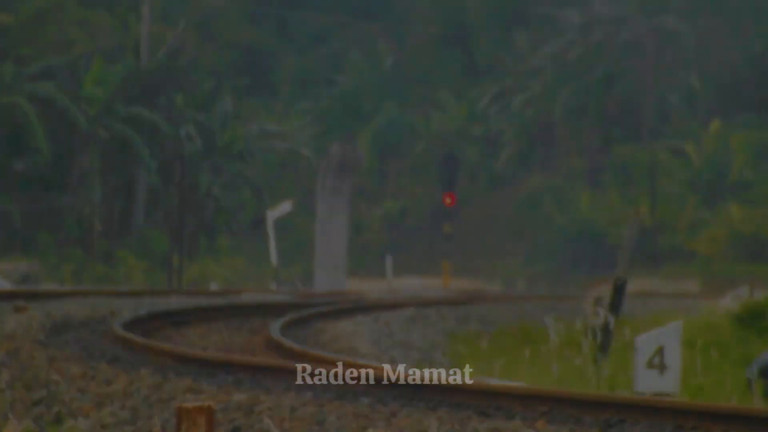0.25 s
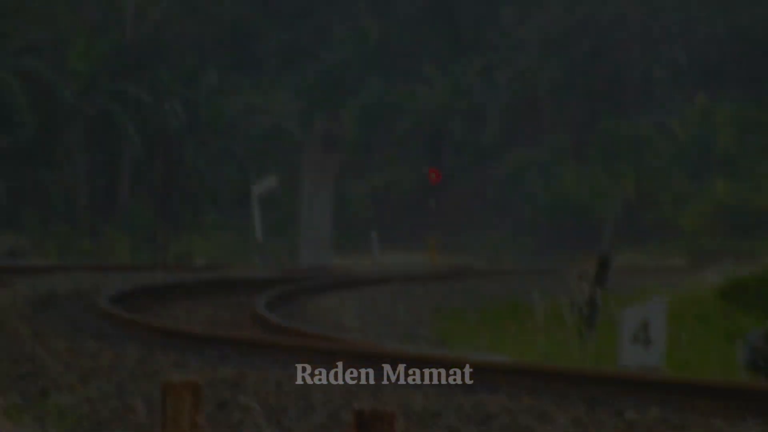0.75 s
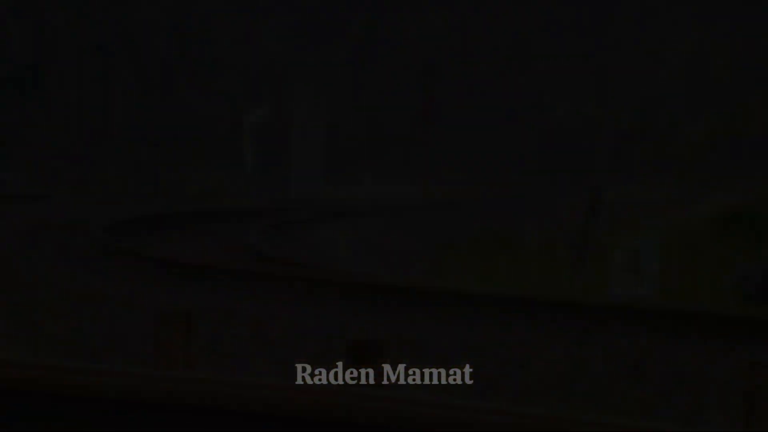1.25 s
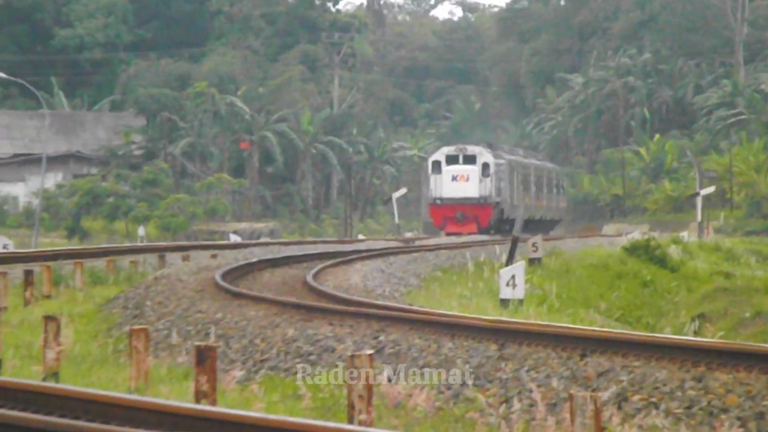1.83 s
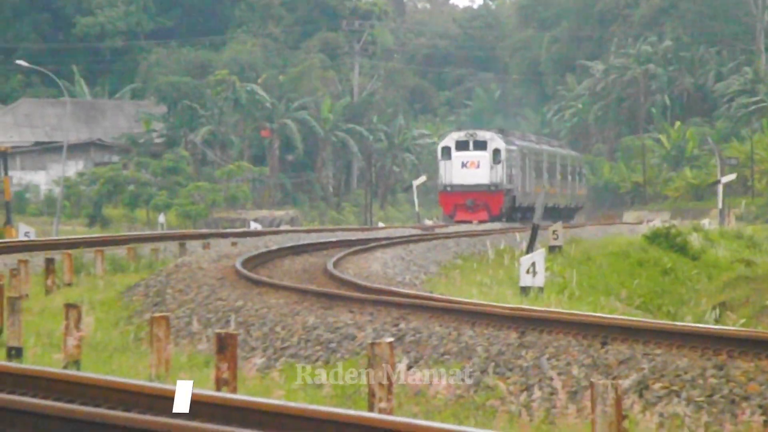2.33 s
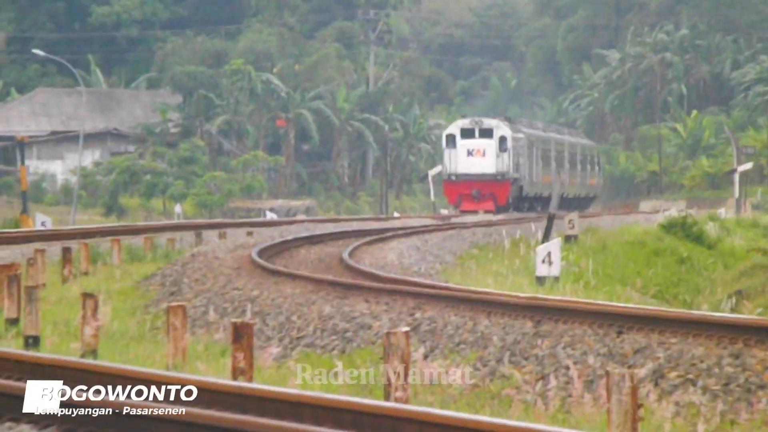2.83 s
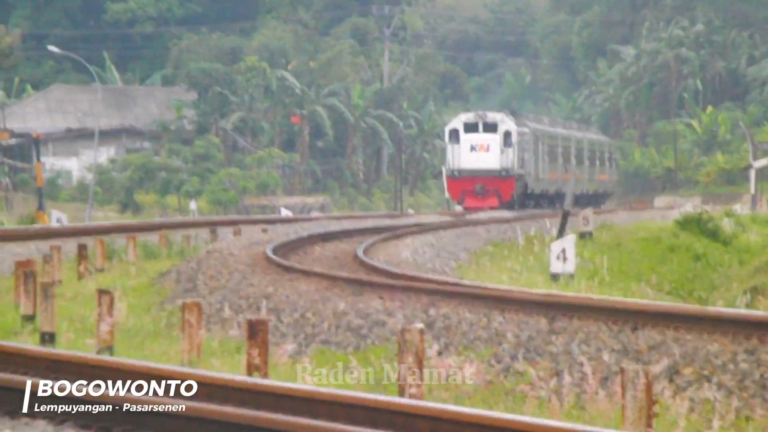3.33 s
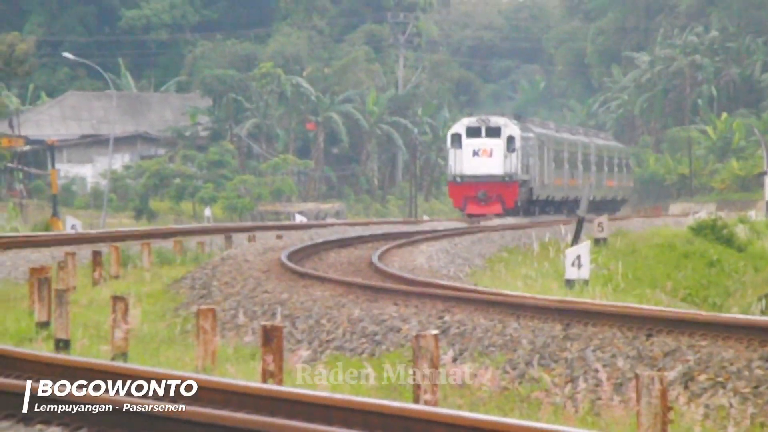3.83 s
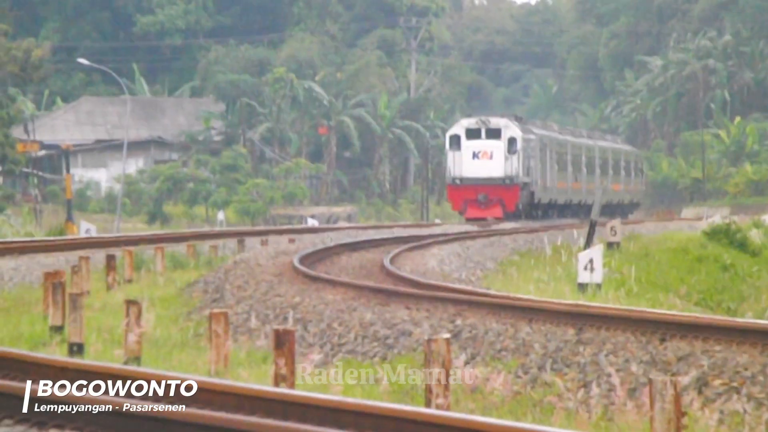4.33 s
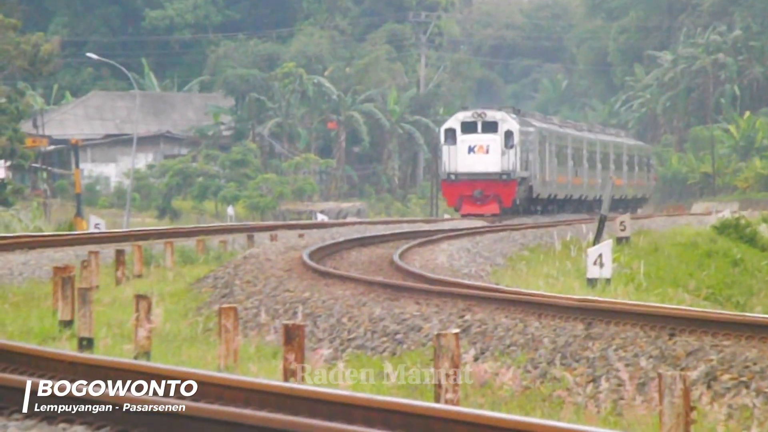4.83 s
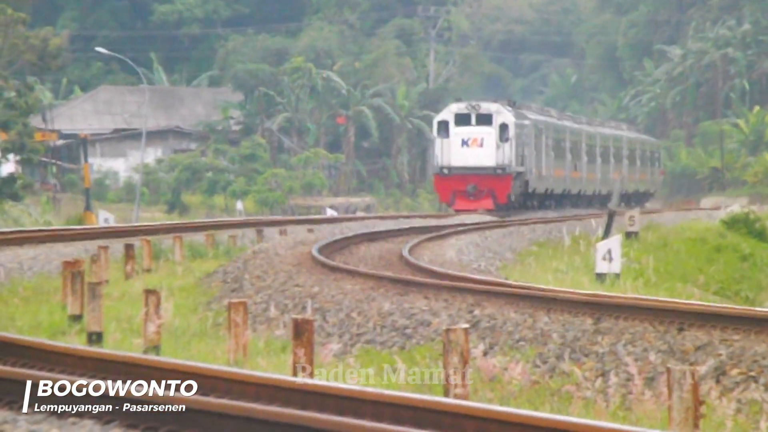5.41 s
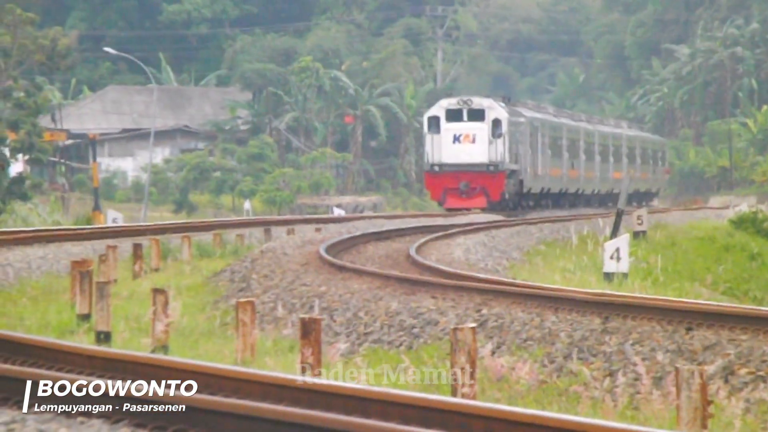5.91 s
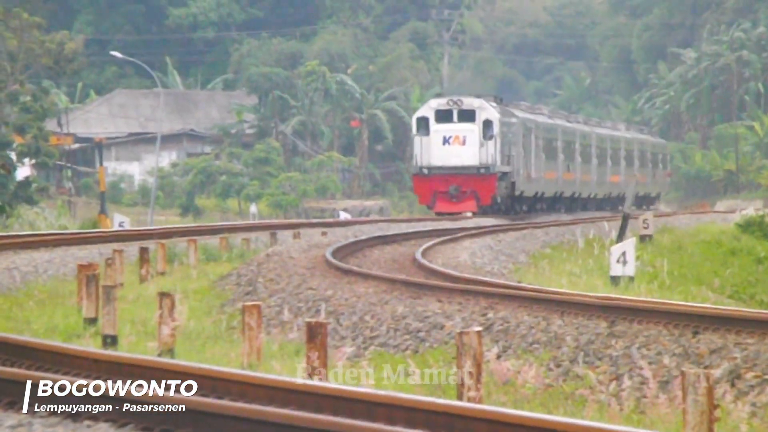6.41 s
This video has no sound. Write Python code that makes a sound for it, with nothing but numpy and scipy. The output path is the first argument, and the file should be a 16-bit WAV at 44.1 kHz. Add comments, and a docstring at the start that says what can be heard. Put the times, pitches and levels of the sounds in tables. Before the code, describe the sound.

From 0 to 1.5 s a shrill cicada chorus, centred near 4.8 kHz, buzzes in fast soft pulses over fainter insects and broad airy hiss. Dry plastic clicks sound very close to the microphone: a sharp one at 0.7, a weaker one at 0.9, a tiny tick near 1.2 and a strong rattly click at 1.4. At 1.5 the sound cuts and fades in within about 0.15 s to a quieter, hissier place with subdued cicadas and an extremely faint diesel rumble around 80-100 Hz, slowly nearing. From about 2.6 the chorus swells, further layers joining at 3.3 and 3.6, reaching a bright throbbing song by 4.4. A faint falling bird chirp passes at 3.7. One layer fades after 5.1 while others keep growing. Slightly higher single cicadas enter at 5.45 and 5.7, settling downwards in pitch; the chorus stays loud to the end.

```python
"""Beside a rural railway track, in two shots joined by a cut and a short fade-in.
Cicada choruses near 4.8 and 3.5 kHz are trains of tymbal pulses that ring softly at the insects' pitch.
Coloured noise makes the far ambience and microphone hiss. In the first shot a plastic part close to the
microphone clicks in short resonances. In the second, narrow noise bands make a distant diesel engine
rumble nearer, the cicadas break into full song, a bird chirps and single cicadas join late."""
import sys
import numpy as np
from scipy import signal
from scipy.fft import rfft, irfft
from scipy.io import wavfile

SR = 44100
rng = np.random.default_rng(int(sys.argv[2]) if len(sys.argv) > 2 else 0)


def boost_factor(decibels):
    """Convert a level in decibels to a linear amplitude factor."""
    exponent = np.asarray(decibels, float) / 20
    return 10 ** exponent


def store_pcm(level_fs):
    """Save levels as 16-bit WAV."""
    pcm = np.round(np.clip(level_fs, -1, 1) * 32767).astype(np.int16)
    wavfile.write(sys.argv[1], SR, np.atleast_2d(pcm).T)


N = 293706

# groups of the main chorus, per shot: tymbal_hz, width_hz, pulses_per_s, timing_jitter (0-1), resting_db
MAIN_GROUPS = [
    [(4720, 70, 36, .2, -31), (4850, 67, 36, 0.01, -30.5), (4920, 140, 36, 0.3, -29)],
    [(4686, 80, 44, .3, -42.5), (4803, 98, 29.5, 0.1, -40.5), (4902, 41, 44, .3, -42)],
]
# fainter steady choruses, per shot: tymbal_hz, width_hz, pulses_per_s, timing_jitter (0-1), level_db
FAR_GROUPS = [
    [(3490, 81, 50, 0.6, -47.5), (3880, 660, 64, 0.4, -44.5), (4570, 440, 40, 0.2, -38),
     (5680, 49, 50, 0.25, -53.5)],
    [(3448, 185, 45, .3, -46.5), (3562, 46, 45, .2, -47.5), (3853, 200, 50, .3, -49.5),
     (4370, 340, 27, 0.2, -50), (5680, 210, 47, 0.5, -55.5)],
]
# nearest singer of each main group in full song: width_hz, pulses_per_s, level_db (against its group)
LEAD_SINGERS = [(60, 35.2, -2.5), (60, 35.2, -7), (36, 17.6, -1.5)]
# full song of each main group in the second shot:
# start_s, swell_s, gain_db, later_change_from_s, later_change_db_per_s
FULL_SONG = [(3.55, .8, 12.5, 5.5, 1.6), (2.55, 1.35, 11.0, 4.3, 1.9), (3.3, 1.1, 11.0, 5.1, -12.0)]
# level change of each main group just before its song: hush_db
SONG_HUSH_DB = [-5.0, 0, -2.0]
# pitch rise of each main group in song and the sag after it: lift_hz, sag_hz_per_s
SONG_PITCH = [(15.14, 5.0), (4.985, 3.3), (44.5, 23.0)]
HUSH_S, LIFT_S = .45, .6   # time to hush, time to rise in pitch

# colour of ambience and microphone hiss, per shot: pitch_hz, density_db (per Hz, relative)
AIR_COLOUR = [
    [(30, -86), (60, -77), (120, -77), (250, -66), (450, -61.5), (800, -61.5), (1500, -63.5), (3000, -65.5),
     (5500, -67.5), (9000, -68), (15500, -67.5)],
    [(30, -85), (60, -89), (120, -74.5), (250, -67), (450, -61.5), (800, -59.5), (1500, -62), (3000, -63.5),
     (5500, -65.5), (9000, -65.5), (15500, -65)],
]
# overall ambience and hiss, per shot: level_db
AIR_LEVEL_DB = [-32, -32.5]

# plastic clicks: start_s, strike_db, hardest_struck_hz, rattle_db
PLASTIC_CLICKS = [(.7195, -3, 1900, -5.5), (.8754, -12, 2400, -28), (1.1745, -21, 5000, -34),
                  (1.4013, -4, 3200, -4)]
# resonances of the plastic part: pitch_hz, level_db (relative), t60_s
PLASTIC_MODES = [(890, -11, 0.016), (1340, -12, 0.011), (2045, -2.5, 0.011), (3030, -0.5, 0.0033),
                 (3890, -2.5, 0.0068), (4650, 3, 0.0035), (5640, -2, 0.004), (6950, -9, 0.0025),
                 (9600, -9, .003)]
RATTLE_GAP_S, RATTLE_LOSS_DB, RATTLE_HZ = .00105, 3.0, 4400   # mean gap, loss per contact, hardest struck

# exhaust resonances: pitch_hz, width_hz, level_db (relative)
EXHAUST_MODES = [(78.4, 27, 2.5), (99.4, 14, 0.5)]
ENGINE_DB, ENGINE_FROM_M, ENGINE_M_PER_S = -65.5, 150.0, 15.0   # level, distance at the cut; approach speed

# faint bird chirp: start_s, length_s, first_hz, last_hz, level_db
BIRD_CHIRP = (3.70, .1, 4400, 3750, -53)

# single cicadas that join late and settle downwards: start_s, length_s, first_hz, drop_hz, level_db
SOLO_CICADAS = [(5.45, .96, 5330, 190.0, -40), (5.7, 1.5, 5130, 45.0, -39)]
SOLO_SWELL_S, SOLO_EDGE_S, SOLO_SETTLE_S = .7, .05, .3   # swell, on and off edges, pitch time constant
SOLO_FROM_DB = -16   # start of the swell, against the full level

CUT_S, FADE_S, FADE_FROM_DB = 1.4864, .135, -34   # cut to the second shot and its fade-in
TOP_HZ = 15480   # upper end of the microphone's band


def rms_one(x):
    """Scale to unit rms."""
    return x / np.sqrt(np.mean(np.abs(x) ** 2) + 1e-20)


def ramp(start_s, length_s):
    """Rises from 0 to 1 along a straight line."""
    return np.clip((np.arange(N) / SR - start_s) / length_s, 0, 1)


def drift(rate_hz):
    """Slow random wander: straight lines between normal draws, two per cycle of the rate."""
    knots = rng.standard_normal(int(N / SR * rate_hz * 2) + 2)
    return np.interp(np.linspace(0, len(knots) - 1, N), np.arange(len(knots)), knots)


def cicadas(hz, width_hz, per_s, jitter, count=5):
    """Each insect buckles its tymbal in a jittered pulse train; the pulses ring softly at the tymbal pitch."""
    pulses = np.full(N, 1e-9, complex)
    for timing, loudness, traits in rng.standard_normal((count, 3, 600)):
        own_rate = per_s * (1 + .04 * traits[0])
        at_s = np.cumsum((1 + jitter * timing) / own_rate) + traits[1] / per_s - .1
        heard = (at_s > 0) & (at_s < (N - 1) / SR)
        size = boost_factor(1.9 * loudness + 1.5 * traits[2])
        phase = 3 * traits[3] + 7.1 * jitter * traits   # rougher timing also scatters the phase
        strike = size * np.exp(1j * phase)
        pulses[(at_s[heard] * SR).astype(int)] += strike[heard]
    # a Bessel low-pass gives each pulse a bell-shaped swell
    bell = signal.bessel(4, width_hz / 2, fs=SR, output="sos", norm="mag")
    envelope = signal.sosfilt(bell, pulses)
    carrier = np.exp(2j * np.pi * np.cumsum(hz * np.ones(N)) / SR)
    return rms_one((envelope * carrier).real)


def chorus(shot):
    """Main groups waver, and in the second shot swell and bend in pitch, over a broad skirt and far choruses."""
    songs = [(0, 0)] * len(SONG_PITCH)
    if shot:
        songs = [song(*level, hush_db, *pitch)
                 for level, hush_db, pitch in zip(FULL_SONG, SONG_HUSH_DB, SONG_PITCH)]
    # a faint broad skirt of cicada sound around the main groups, following the middle one
    skirt_db = MAIN_GROUPS[shot][1][-1] + songs[1][0] - 17.0
    out = boost_factor(skirt_db) * cicadas(4800, 880.0, 60.0, 0.32, count=16)
    for (gain_db, slide_hz), (hz, *voice, db), lead, level in zip(
            songs, MAIN_GROUPS[shot], LEAD_SINGERS, FULL_SONG):
        group = cicadas(hz + slide_hz, *voice, count=14)
        if shot:
            # the nearest singer throbs evenly
            width_hz, per_s, lead_db = lead
            singer = cicadas(hz + slide_hz, width_hz, per_s, .04, count=1)
            start_s, swell_s = level[:2]
            group = group + ramp(start_s, swell_s) * boost_factor(lead_db) * singer
        out = out + boost_factor(db + gain_db + 0.75 * drift(1.1)) * group
    for *voice, db in FAR_GROUPS[shot]:
        out = out + boost_factor(db + 0.24 * drift(2.2)) * cicadas(*voice, count=16)
    return out


def air(shot, patchy_db):
    """Ambience and hiss: coloured noise that breathes a little."""
    hz, db = np.transpose(AIR_COLOUR[shot])
    colour = boost_factor(np.interp(np.log(np.fft.rfftfreq(N, 1 / SR) + 1), np.log(hz), db))
    noise = rms_one(irfft(rfft(rng.standard_normal(N)) * colour, N))
    return boost_factor(AIR_LEVEL_DB[shot] + patchy_db * drift(14)) * noise


def clicks():
    """Every contact strikes the same short modes, weaker the further they lie from where it bites."""
    contacts = [row[:3] for row in PLASTIC_CLICKS]
    spreads = rng.uniform(-1.1, 1, (len(PLASTIC_CLICKS), 3))
    # three more contacts rattle after each click
    for (start_s, _, _, rattle_db), spread in zip(PLASTIC_CLICKS, spreads):
        for k, uneven in enumerate(spread):
            contact_s = start_s + RATTLE_GAP_S * (k + 1 + 0.2 * uneven)
            contacts.append((contact_s, rattle_db - RATTLE_LOSS_DB * k, RATTLE_HZ))
    contact_s, strike_db, bite_hz = np.transpose(contacts)
    out = np.zeros(N)
    for k, (hz, db, t60_s) in enumerate(PLASTIC_MODES):
        hits = np.full(N, 1e-18)
        hit_db = strike_db + db - 6.6 * np.log2(hz / bite_hz) ** 2
        hits[(contact_s * SR).astype(int)] = (-1) ** k * boost_factor(hit_db)   # modes alternate in polarity
        # a two-pole resonator rings as a decaying sine
        decay, turn = boost_factor(-60 / (t60_s * SR)), 2 * np.pi * hz / SR
        out += signal.lfilter([0, np.sin(turn)], [1, -2 * decay * np.cos(turn), decay * decay], hits)
    # a small part radiates no bass
    out = signal.sosfilt(signal.butter(2, 650, "high", fs=SR, output="sos"), out)
    return signal.lfilter([.25, .5, .25], [1], out)   # the contact is slightly soft


def engine():
    """Distance leaves only the lowest exhaust resonances, blurred by the path; level goes as 1 / distance."""
    rumble = 0
    for hz, width_hz, db in EXHAUST_MODES:
        band = signal.butter(2, [hz - width_hz / 2, hz + width_hz / 2], "band", fs=SR, output="sos")
        rumble = rumble + boost_factor(db) * rms_one(signal.sosfilt(band, rng.standard_normal(N)))
    distance_m = ENGINE_FROM_M - ENGINE_M_PER_S * (np.arange(N) / SR - CUT_S)
    return boost_factor(ENGINE_DB) * ENGINE_FROM_M / distance_m * rms_one(rumble)


def song(start_s, swell_s, gain_db, later_s, later_db_per_s, hush_db, lift_hz, sag_hz_per_s):
    """Level in dB and pitch shift in Hz of a group that may hush, swells into song, then grows on or tires."""
    t = np.arange(N) / SR
    swell = ramp(start_s, swell_s)
    hush = ramp(start_s - HUSH_S, HUSH_S) - swell
    db = hush_db * hush + gain_db * swell + later_db_per_s * np.maximum(t - later_s, 0)
    sag_hz = sag_hz_per_s * np.maximum(t - start_s - LIFT_S, 0)
    return db, lift_hz * ramp(start_s, LIFT_S) - sag_hz


def bird():
    """A chirp: one falling sine whistle under a rounded envelope."""
    start_s, length_s, first_hz, last_hz, db = BIRD_CHIRP
    along = ramp(start_s, length_s)
    hz = first_hz + (last_hz - first_hz) * along
    envelope = np.sqrt(2 * np.abs(np.sin(np.pi * along)))
    return boost_factor(db) * envelope * np.sin(2 * np.pi * np.cumsum(hz) / SR)


def solo():
    """Single steadier cicadas settle in pitch, each with a few rougher ones singing just below it."""
    out = 0
    for start_s, length_s, first_hz, drop_hz, db in SOLO_CICADAS:
        since_s = length_s * ramp(start_s, length_s)
        hz = first_hz - drop_hz * (1 - np.exp(-since_s / SOLO_SETTLE_S))
        swell = boost_factor(db + SOLO_FROM_DB * (1 - ramp(start_s, SOLO_SWELL_S)))
        gate = ramp(start_s, SOLO_EDGE_S) - ramp(start_s + length_s, SOLO_EDGE_S)
        single = cicadas(hz, 24.0, 17.6, .04, count=1)
        rougher = boost_factor(3.0) * cicadas(hz - 120, 130.0, 50.0, 0.51, count=8)
        out = out + swell * gate * (single + rougher)
    return out


def scene():
    """Two shots: the first is cut off, the second fades in evenly in dB."""
    since_cut_s = np.arange(N) / SR - CUT_S
    first = chorus(0) + air(0, patchy_db=0.74) + clicks()
    second = chorus(1) + air(1, patchy_db=0.44) + engine() + bird() + solo()
    fade = boost_factor(FADE_FROM_DB * np.clip(1 - since_cut_s / FADE_S, 0, 1))
    mono = np.where(since_cut_s < 0, first, fade * second)
    return np.array([mono, mono])


def band_limit(x):
    """A steep low-pass at the top of the band."""
    return signal.sosfilt(signal.butter(12, 16380, fs=SR, output="sos"), x)


def record(dry):
    """One microphone on both channels, the left one sample late; the top is cut."""
    late = np.array([np.append(0, dry[0, :-1]), dry[1]])
    top_cut = signal.ellip(12, .3, 60, TOP_HZ, fs=SR, output="sos")
    mix = signal.sosfilt(top_cut, late)
    return band_limit(mix)


dry = scene()
out = record(dry)
store_pcm(out)
```